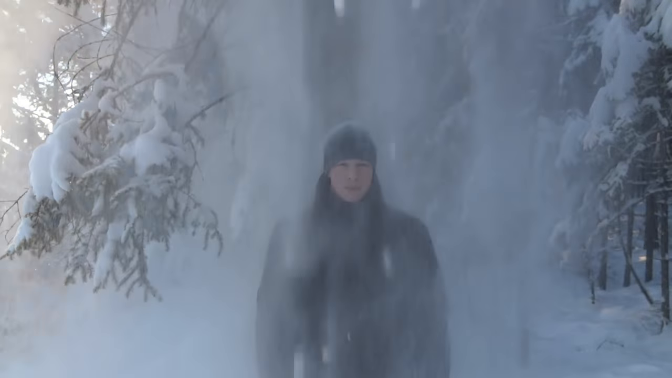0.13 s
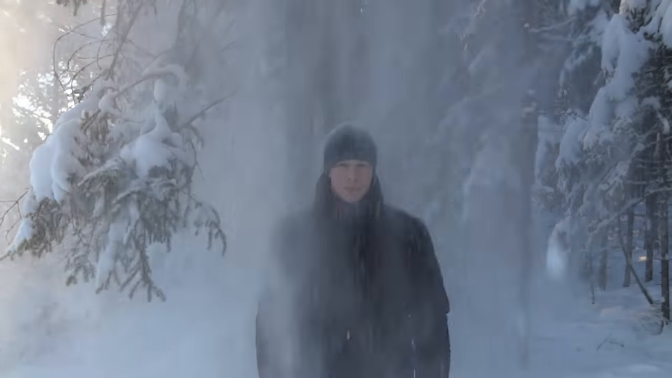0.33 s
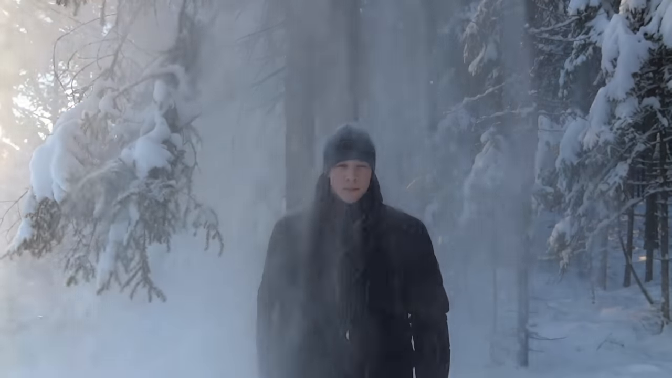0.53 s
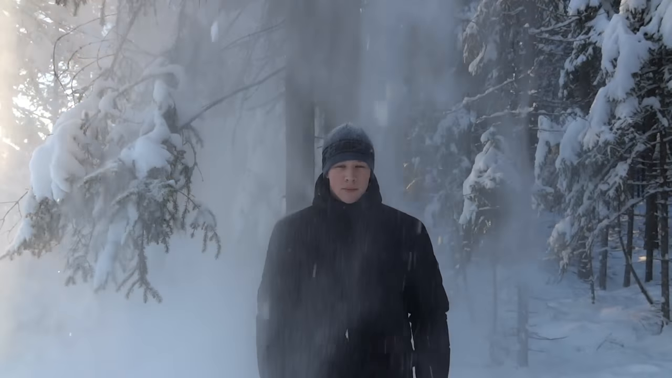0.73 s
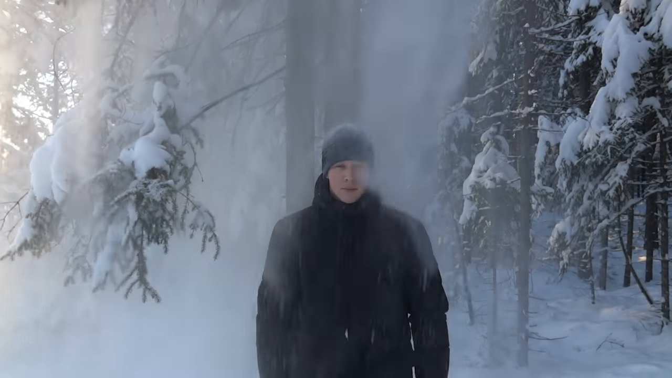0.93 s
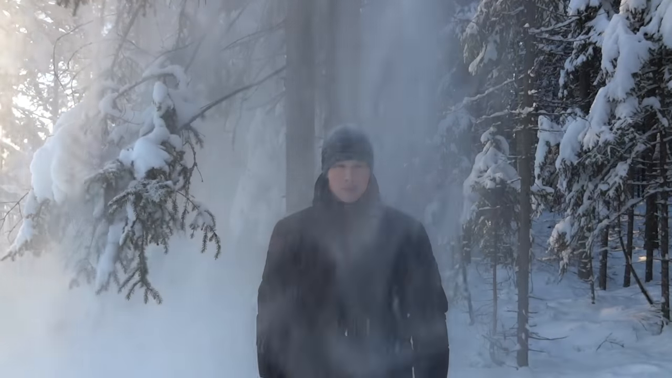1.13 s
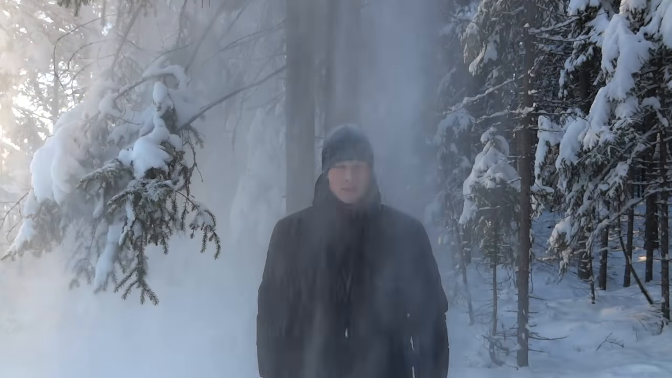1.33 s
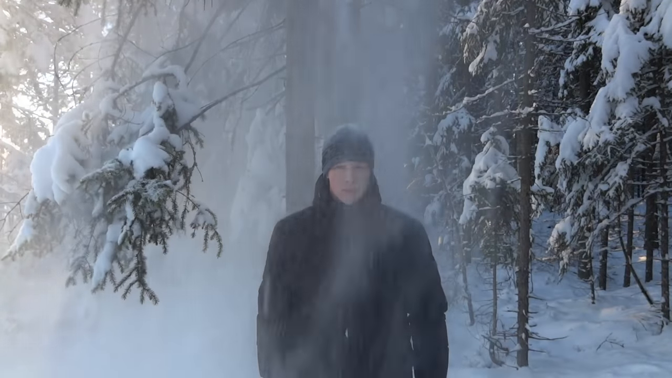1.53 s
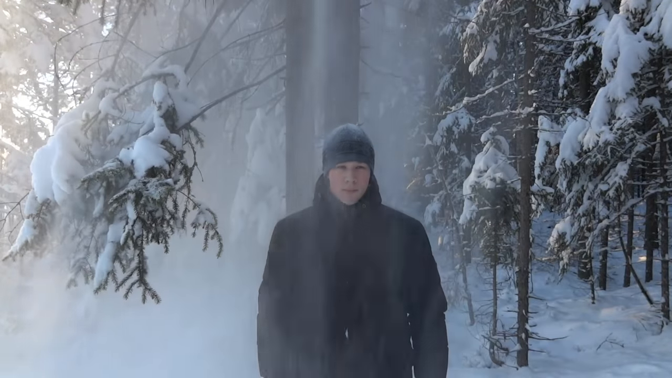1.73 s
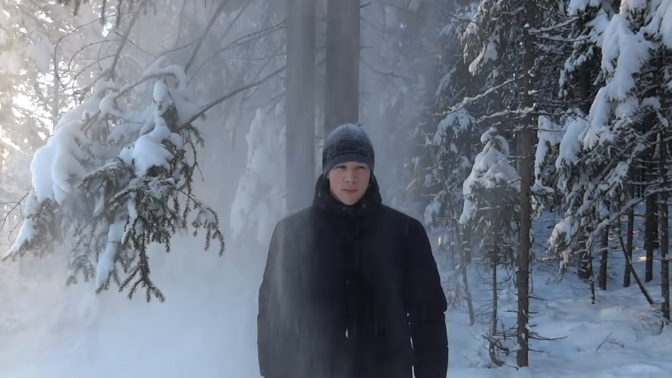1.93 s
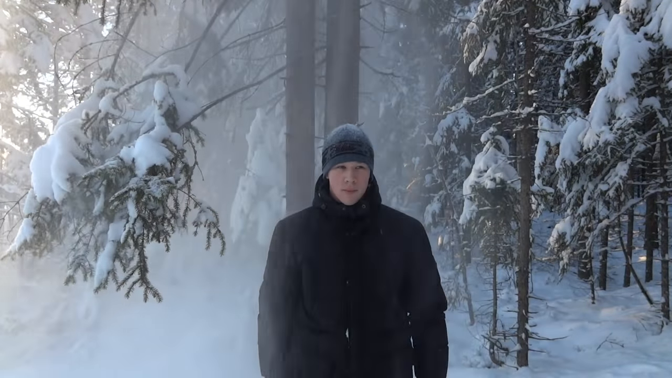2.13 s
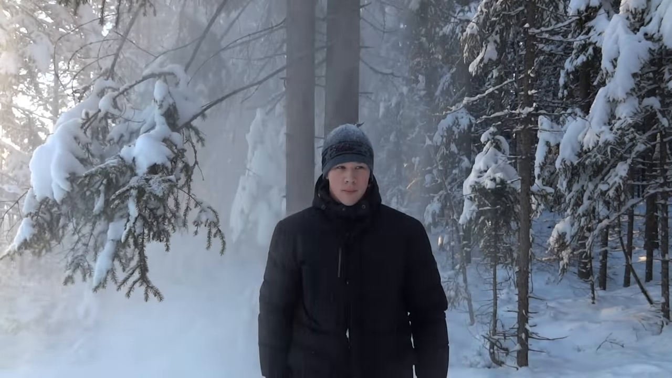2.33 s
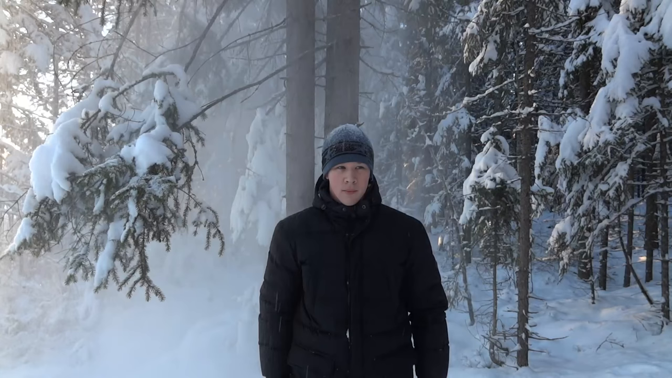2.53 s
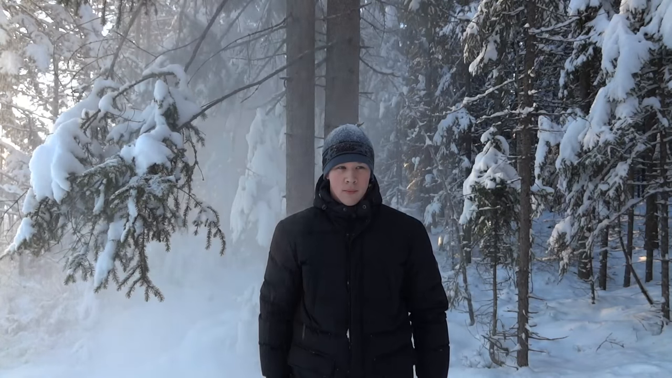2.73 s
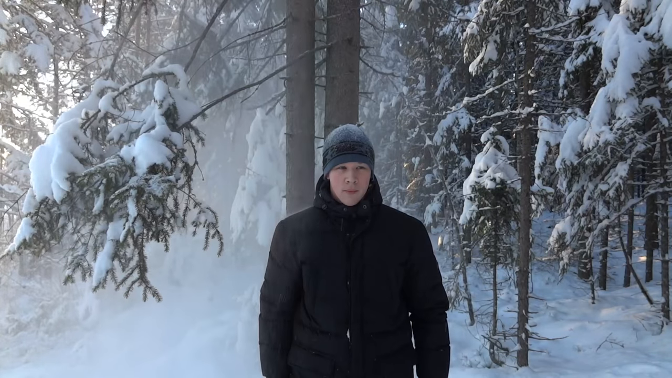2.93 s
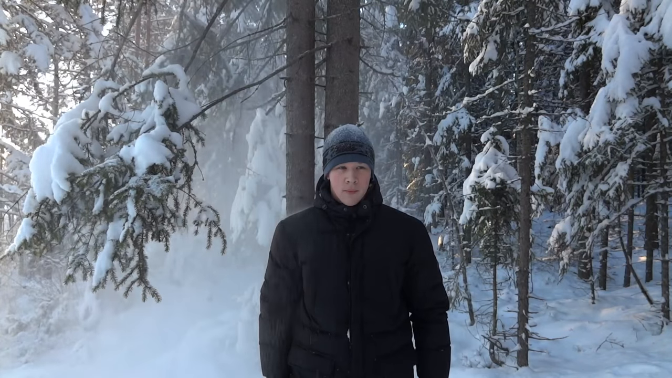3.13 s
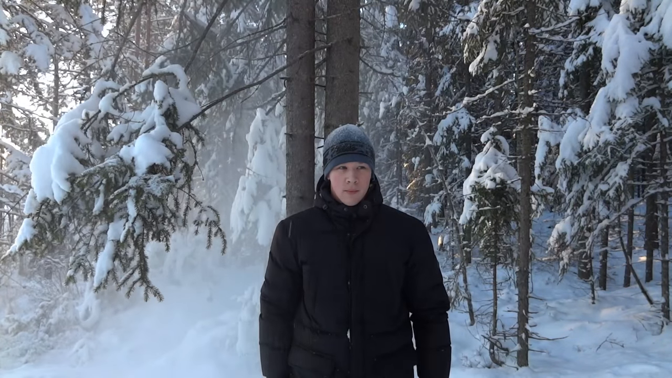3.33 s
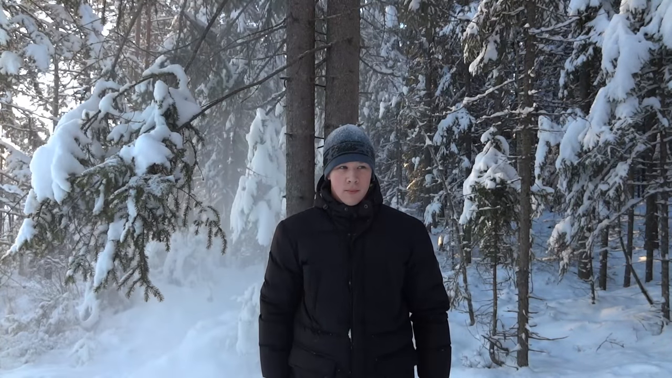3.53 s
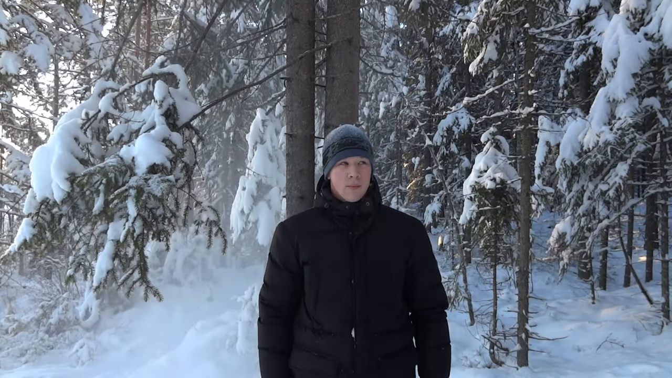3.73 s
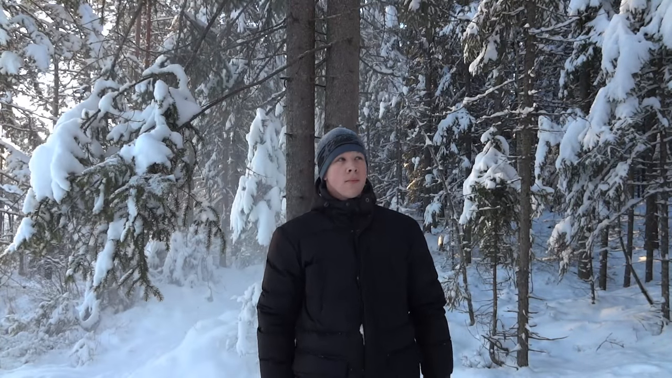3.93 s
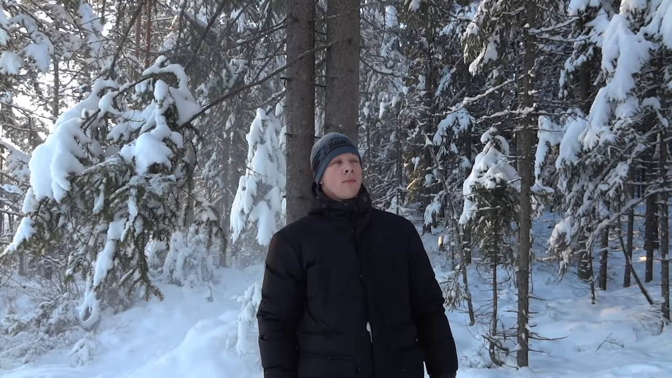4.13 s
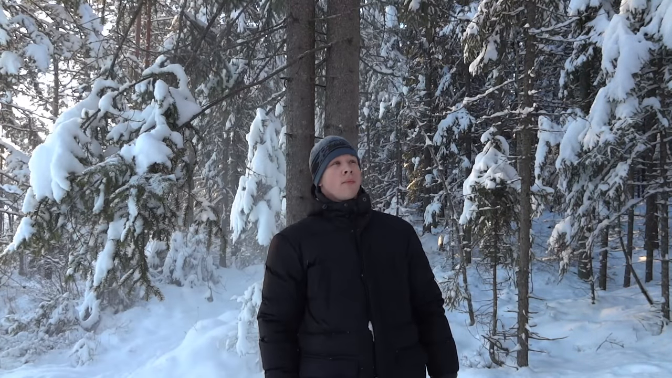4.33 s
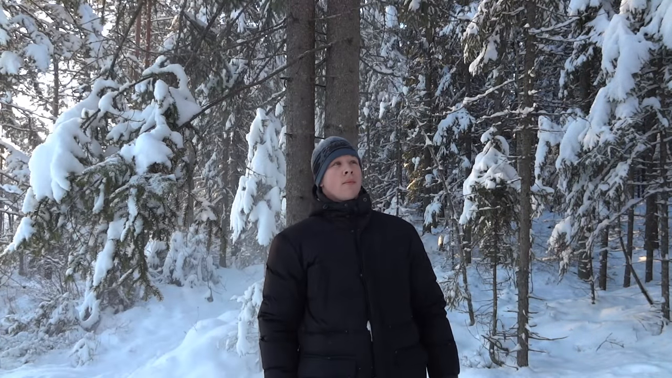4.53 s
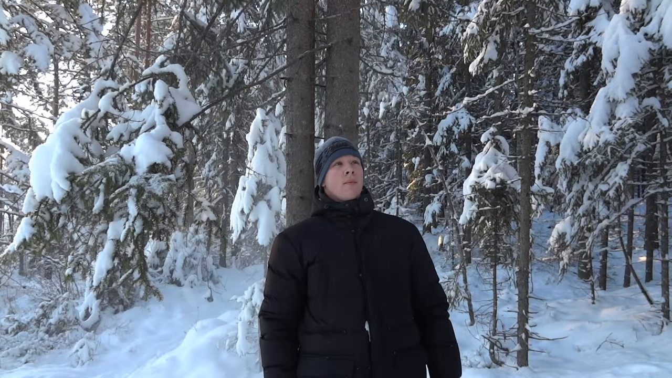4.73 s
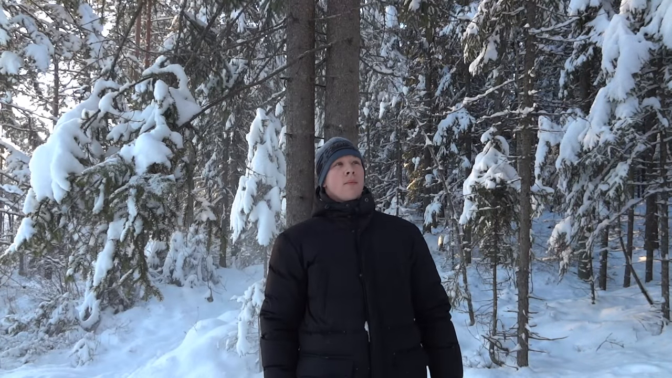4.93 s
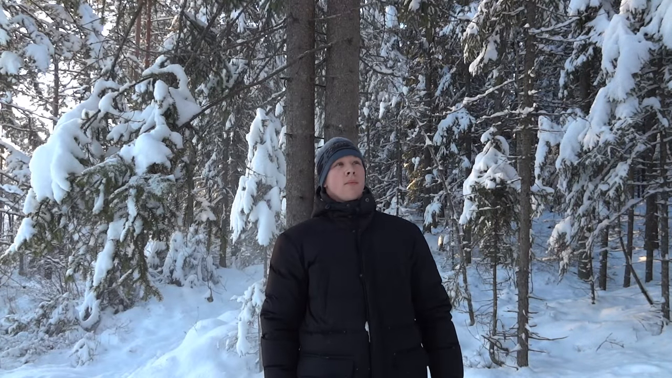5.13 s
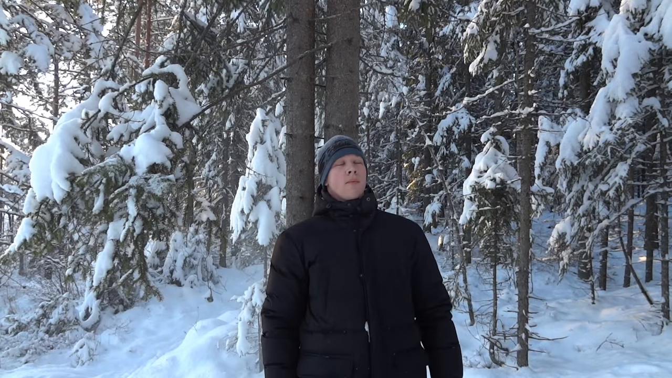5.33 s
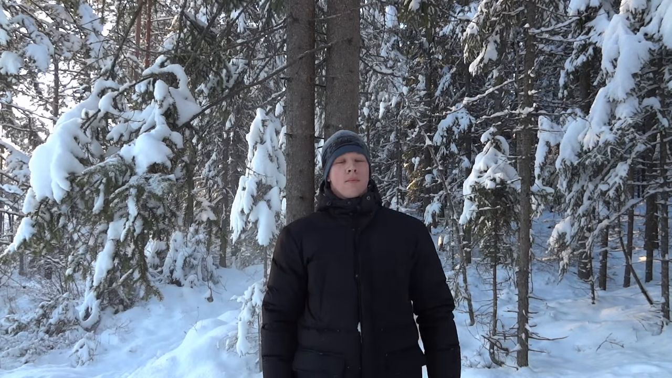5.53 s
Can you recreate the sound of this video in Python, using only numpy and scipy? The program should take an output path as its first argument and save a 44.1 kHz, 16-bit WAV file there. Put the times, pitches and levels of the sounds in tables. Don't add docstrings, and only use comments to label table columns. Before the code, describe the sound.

A shower of powder snow is already pouring onto a padded coat close to a small microphone. Crystals hiss brightly in clumps while lumps pat and thump the cloth, some bursting into crisp spray. After about two seconds the fall weakens, leaving separate pats and tiny ticks. A stiff collar rubs faintly once, then only quiet forest air remains.

```python
import sys
import numpy as np
from scipy import signal
from scipy.fft import rfft, irfft, next_fast_len
from scipy.io import wavfile
from scipy.ndimage import uniform_filter1d

SR = 44100
rng = np.random.default_rng(int(sys.argv[2]) if len(sys.argv) > 2 else 0)


def ratio_of_db(decibels):
    return 10 ** (np.asarray(decibels, float) / 20)


def file_out(sig):
    cols = np.atleast_2d(sig).T
    lim = np.clip(cols, -1, 1)
    pcm = np.round(lim * 32767).astype(np.int16)
    wavfile.write(sys.argv[1], SR, pcm)


N = 250047
T = np.arange(N) / SR

# time in seconds, flow in dB.
SNOW_FLOW = [(0.0, -34), (0.11, -35.5), (0.31, -33), (0.36, -36), (0.6, -37), (0.85, -37), (0.99, -35),
             (1.4, -37), (1.7, -39), (2.0, -41.5), (2.4, -46.5), (2.85, -48.5), (3.1, -52), (3.3, -57),
             (3.62, -60), (4.3, -65), (4.7, -73.5), (5.3, -85.5)]
# frequency in Hz, density in dB per Hz.
CRYSTAL_COLOUR = [(2060, -62), (3500, -9.5), (5970, -2), (12300, 4), (14700, 3), (15700, -9)]
# frequency in Hz, density in dB per Hz.
PATTER_COLOUR = [(88, -112), (150, -32), (247, -32), (341, -20), (457, -8), (655, -3.5), (1570, -5.5),
                 (3010, 3.5), (5480, -4.5), (9000, -15), (11700, -4), (19800, -120)]
# frequency in Hz, side against mid in dB.
SNOW_WIDTH = [(150, -13), (600, -11.5), (1200, -12), (2500, -27), (5000, -26.5), (12000, -33)]
# frequency in Hz, density in dB per Hz.
AIR_MID_COLOUR = [(40, -29), (80, -15), (150, -8), (260, 0), (450, 1.5), (800, 0), (1500, -2.5), (3000, -5),
                  (6000, -7), (9000, -6.5), (12500, -5.5), (15500, -6)]
# frequency in Hz, density in dB per Hz.
AIR_SIDE_COLOUR = [(40, -34), (80, -23), (150, -19), (260, -10.5), (450, -3), (800, -1), (1500, -3.5),
                   (3000, -9.5), (6000, -18.5), (15500, -32)]
# start in seconds, peak in dB, pitch in Hz, length in cycles.
CLODS = [
    (0.016, -58, 203, 0.79),
    (.188, -40.5, 340, 1.05),
    (.247, -40, 447, 2),
    (.303, -41.5, 456, 1.02),
    (.552, -55, 180, 0.76),
    (.785, -57, 360, 0.91),
    (0.847, -51, 268, 0.98),
    (1.163, -32.5, 540, 1.96),
]
# time in seconds, peak in dB, pitch in Hz, decay in cycles.
BIG_LUMPS = [(0.119, -25, 2920, 1.2), (0.1654, -26, 3700, 1.6), (0.1904, -11, 2200, 0.24),
             (0.2233, -9, 3500, 0.73), (0.4813, -14.5, 2450, 0.35), (0.4977, -14, 3300, 0.46),
             (0.5464, -18, 2070, 0.37), (0.6805, -19, 4170, 1.2), (0.7165, -20, 3150, 0.79),
             (0.7879, -14, 2250, 0.48), (0.8846, -17, 2990, 0.81), (0.965, -18, 2570, 1.5),
             (1.0867, -19, 1980, 1), (1.166, -10.5, 2270, 0.41), (1.2102, -20, 2800, 1.1),
             (1.5926, -18, 4100, 1.07), (1.664, -20, 2975, 1), (1.6728, -19.5, 2360, 0.73),
             (1.896, -19, 1670, 0.38), (2.0273, -23, 3340, 1.2), (2.1667, -24.5, 945, 0.51),
             (2.216, -22, 2270, 0.23), (2.2207, -26, 2430, 0.41), (2.5134, -29, 3360, 1.2),
             (2.6425, -27, 3200, 1.7), (2.6624, -29, 4060, 0.71), (2.7769, -30, 2860, 1.1),
             (2.8807, -28, 915, 0.41), (2.8915, -28.5, 3530, 1.72), (2.9164, -22, 2960, 0.88)]
# time in seconds, peak in dB, pitch in Hz, decay in cycles.
LAST_LUMPS = [(2.9795, -38, 1980, 1.56), (3.0112, -32, 3340, 1.4), (3.029, -35, 2900, 0.98),
              (3.134, -39, 3200, 1.6), (3.1808, -28.5, 3320, 1.1), (3.2086, -38, 3060, 1.2),
              (3.228, -41, 3900, 1.1), (3.3016, -47, 4350, 1.2), (3.3784, -47, 4420, 1.2),
              (3.5496, -32.5, 4400, 0.81), (3.7127, -42, 2740, 1.02), (3.752, -42, 2790, 0.85),
              (3.815, -40, 2220, 0.31), (3.9539, -30.5, 3700, 0.59), (4.148, -37, 3340, 0.87),
              (4.2146, -40, 4320, 0.66), (4.262, -44, 1520, 0.52), (4.337, -48, 1120, 1.04),
              (4.45, -44, 2900, 0.78), (4.7925, -47, 2630, 0.99), (5.055, -50, 2820, 1.2)]
# time in seconds, size in dB over the lump level, pitch in Hz.
BROKEN_CLUMPS = [(.110, 14, 2200), (.163, 13, 2920), (0.3047, 3, 1600), (.445, 11, 2700), (0.506, 13, 2000),
                 (.614, 9, 2400), (.645, -4, 3020), (.672, 10, 2250), (1.03, 8, 2900), (1.132, 16, 2300),
                 (1.246, 12, 2630), (1.362, 15, 2500), (1.476, 15, 3400), (1.66, 15, 3300),
                 (1.82, 19, 3200), (1.841, 14, 2900), (1.88, 4, 1400), (1.931, 18, 3200), (1.977, 18, 1700),
                 (2.001, 18, 2340), (2.034, 15.5, 1490), (2.236, 15, 1500), (2.285, 20.5, 2700),
                 (2.415, 16, 3000), (2.489, 17, 2600), (2.541, 19, 3200), (2.722, 19.5, 3300),
                 (2.75, 18, 2600), (2.785, 17, 2000), (2.806, 17, 2200)]
# time in seconds, peak in dB, centre in Hz, length in ms.
POWDER_BURSTS = [(0.192, -25, 10400, 13), (0.1925, -19.5, 9000, 5.5), (0.496, -18.5, 9250, 2.8),
                 (0.5468, -27, 10490, 2.5), (0.7784, -34, 10920, 0.6), (0.8385, -32, 12530, 9.7),
                 (0.8394, -26.5, 9710, 3.9), (0.8857, -25, 12070, 1), (1.5925, -22, 9870, 0.78),
                 (1.7216, -23.5, 11700, 1.2), (1.8093, -22, 11930, 0.78), (2.0336, -31, 10650, 1.6),
                 (2.3779, -31.5, 7520, 1.2), (2.6422, -39, 10170, 1.3), (2.655, -34, 11490, 1.5),
                 (2.8472, -30, 12520, 3), (2.8808, -31.7, 13210, 1.5), (3.8513, -41, 12300, 3.5)]
# time in seconds, peak in dB, centre in Hz.
TICKING_GRAINS = [(3.1342, -37, 11900), (3.1797, -36, 10770), (3.2276, -37, 12300), (3.261, -38, 10400),
                  (3.3215, -42, 9450), (3.3472, -38, 11910), (3.5777, -47, 12200), (3.6011, -48, 11090),
                  (3.636, -47.5, 13360), (3.6722, -42.5, 10100), (3.713, -48, 11510), (3.765, -43, 13490),
                  (3.931, -39, 11550), (3.954, -49, 8330), (4.0929, -44, 10340), (4.1773, -46, 10040),
                  (4.1959, -47, 8450), (4.2146, -46, 10800), (4.2623, -49, 10000), (4.3335, -54, 10500),
                  (4.3403, -41, 11670), (4.45, -45, 12180), (4.4876, -58, 11430), (4.5199, -56, 10810),
                  (4.5402, -53, 12240), (4.7153, -53, 12600), (4.7924, -51, 10770), (4.9638, -54, 11210),
                  (5.0543, -50, 9910), (5.2654, -58.2, 10140)]
# frequency in Hz, width in Hz, level in dB.
COLLAR_MODES = [(754, 950, 2.5), (3100, 2900, 1), (4740, 3500, 2), (9100, 3100, 1.5), (12000, 3500, -1)]

AIR_MID_DB, AIR_SIDE_DB = -65.8, -67.5
LUMP_SHARE_DB, LUMP_LOSS_DB_PER_S = -2, -2
EMPTY_S, EMPTY_FADE_DB_PER_S = 3.2, -72
DRIZZLE_DB, DRIZZLE_FADE_DB_PER_S = -67, -5
PIECES, SCATTER_S, SMALLER_DB = 3, .009, 0
PITCH_SPREAD, PIECE_CYCLES = 0.41, 0.55
GRAIN_MS, GRAIN_DB = 1.25, -1
RUB_DB, RUB_S = -55.5, 4.04
RUB_RISE_S, RUB_STOP_S, RUB_DULLING_S = .1, .11, .025


def evened(x):
    return x / np.sqrt(np.mean(x ** 2) + 1e-20)


def colour(x, points):
    hz, db = np.transpose(points)
    size = next_fast_len(N)
    log_hz = np.log(np.fft.rfftfreq(size, 1 / SR) + 1)
    gain = ratio_of_db(np.interp(log_hz, np.log(hz), db))
    return irfft(rfft(x, size) * gain, size)[:N]


def highpass(x, order, hz):
    return signal.sosfilt(signal.butter(order, hz, "highpass", fs=SR, output="sos"), x)


def add(mix, s, sound):
    part = mix[max(round(s * SR), 0):][:len(sound)]
    part += sound[:len(part)]


def landings(per_s, spread_db):
    when, size, sign = rng.random((N, 3)).T
    size_db = spread_db * np.minimum(-np.log(size + 1e-9), 4)
    return (when < per_s / SR) * np.sign(sign - .5) * ratio_of_db(size_db)


def gusts(ms, depth_db):
    drift = uniform_filter1d(rng.standard_normal(N), max(int(ms * SR / 1000), 1))
    return ratio_of_db(depth_db * evened(drift))


def flow_db():
    return np.interp(T, *np.transpose(SNOW_FLOW), right=-99)


def lump_db():
    share_db = LUMP_SHARE_DB + LUMP_LOSS_DB_PER_S * T
    return flow_db() + share_db + EMPTY_FADE_DB_PER_S * np.maximum(T - EMPTY_S, 0)


def pat(hz, cycles):
    u = np.arange(int(5 * cycles / hz * SR) + 4) * hz / SR
    swing = -np.sin(2 * np.pi * 1.12 * u ** .85) * (1 - np.exp(-u / .07))
    wave = swing * np.exp(-u / np.clip(.8 * cycles, .15, 3))
    return wave / abs(wave).max()


def air():
    mid = evened(colour(rng.standard_normal(N) * gusts(60, 0.18), AIR_MID_COLOUR))
    side = evened(colour(rng.standard_normal(N), AIR_SIDE_COLOUR))
    return ratio_of_db(AIR_MID_DB) * mid, ratio_of_db(AIR_SIDE_DB) * side


def hiss():
    ticks = evened(landings(9000, 2.6)) + .8 * rng.standard_normal(N)
    clumped = ticks * gusts(2.1, 0.81) * gusts(27, 0.58)
    return ratio_of_db(flow_db()) * evened(colour(clumped, CRYSTAL_COLOUR))


def patter():
    near = np.zeros(N)
    for hz in np.geomspace(800, 4500, num=8):
        near += signal.oaconvolve(landings(120, 3.6), pat(hz, .8))[:N]
    near = colour(near, [(200, -4), (700, 2.5), (3000, 8.5), (5000, 13.5), (9000, 1)])
    far = colour(rng.standard_normal(N) * gusts(9.1, 1.5), PATTER_COLOUR)
    drizzle_db = DRIZZLE_DB + DRIZZLE_FADE_DB_PER_S * (T - EMPTY_S)
    level = np.hypot(ratio_of_db(lump_db()), ratio_of_db(drizzle_db))
    return level * evened(evened(far) + 0.69 * evened(near))


def thuds():
    out = np.zeros(N)
    for s, db, hz, cycles in CLODS:
        u = np.arange(int(2 * cycles / hz * SR)) * hz / SR
        add(out, s, ratio_of_db(db) * np.sin(2 * np.pi * (u - cycles)) * np.hanning(len(u)))
    return out


def flurry_pieces():
    rows, level_db = [], lump_db()
    chances = rng.uniform(-0.91, 1, (len(BROKEN_CLUMPS), PIECES, 3))
    for (s, db, hz), chance in zip(BROKEN_CLUMPS, chances):
        for k, (when, pitch, length) in enumerate(chance):
            piece_s = s + k * SCATTER_S * when
            piece_db = level_db[int(s * SR)] + db + 4.0 + k * SMALLER_DB
            piece_hz = hz * (1 + min(k, 1) * PITCH_SPREAD * pitch)
            rows.append((piece_s, piece_db, piece_hz, PIECE_CYCLES * (1 + 0.22 * length)))
    return rows


def lumps():
    out = np.zeros(N)
    for s, db, hz, cycles in BIG_LUMPS + LAST_LUMPS + flurry_pieces():
        add(out, s - 0.38 / hz, ratio_of_db(db - 2) * pat(hz, cycles))
    return out


def bursts():
    out = np.zeros(N)
    u = np.arange(-400, 400) / SR * 1000
    grains = [(s, db + GRAIN_DB, hz, GRAIN_MS) for s, db, hz in TICKING_GRAINS]
    for s, db, hz, ms in POWDER_BURSTS + grains:
        spray = rng.standard_normal(len(u))
        shape = np.exp(-abs(u / np.clip(0.65 * (ms - .75), .08, 6)) ** 6)
        band = signal.butter(2, [0.66 * hz, min(1.64 * hz, .45 * SR)], "bandpass", fs=SR)
        burst = signal.lfilter(*band, shape * spray)
        add(out, s + u[0] / 1000, ratio_of_db(db + 5.0) * burst / abs(burst).max())
    return out


def collar():
    slips = landings(4000, 2.5) * gusts(12, 0.59)
    ring = np.zeros(N)
    for k, (hz, width, mode_db) in enumerate(COLLAR_MODES):
        mode = signal.iirpeak(hz, hz / width, fs=SR)
        ringing = signal.lfilter(*mode, signal.lfilter(*mode, slips))
        late = T - RUB_S + RUB_DULLING_S * np.log2(max(hz, 4000) / 6000)
        pace = np.where(late < 0, RUB_RISE_S, RUB_STOP_S)
        swell_db = np.maximum(-10 * (late / pace) ** 2, -99)
        ring += (-1) ** k * ratio_of_db(mode_db + swell_db) * ringing
    stroke = ring[int((RUB_S - .03) * SR):int((RUB_S + .03) * SR)]
    return ratio_of_db(RUB_DB) * ring / np.std(stroke)


def scene():
    mid, side = air()
    shower = hiss() + patter() + collar()
    strikes = highpass(lumps(), 2, 420) + bursts()
    shower, strikes = highpass([shower, strikes], 4, 310)
    strikes = strikes + highpass(thuds(), 2, 140)
    mid = mid + shower + strikes
    lean = uniform_filter1d(rng.standard_normal(N), size=150)
    lean = evened(uniform_filter1d(lean, size=150))
    late = signal.hilbert(shower + strikes, next_fast_len(N))[:N].imag
    leaning = 0.56 * (shower + 1.1 * strikes) * lean
    side = side + colour(leaning + 0.83 * late, SNOW_WIDTH)
    return np.array([mid + side, mid - side])


def roll_off(x):
    return signal.sosfilt(signal.butter(12, 15940, fs=SR, output="sos"), x)


def record(dry):
    edge = signal.firwin(1023, 15930, window=("kaiser", 9), fs=SR)
    mix = signal.oaconvolve(dry, edge[None], "same")
    return roll_off(mix)


dry = scene()
out = record(dry)
file_out(out)
```